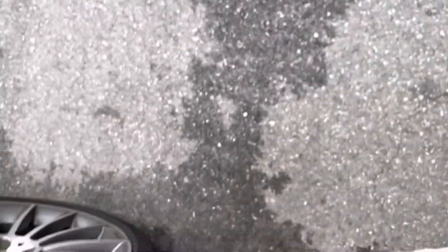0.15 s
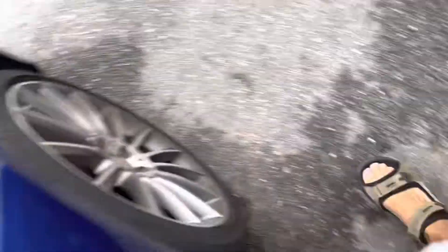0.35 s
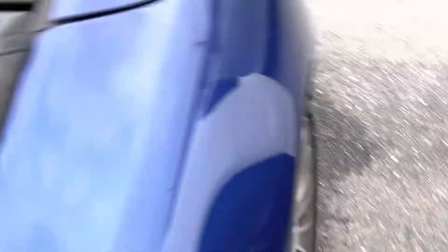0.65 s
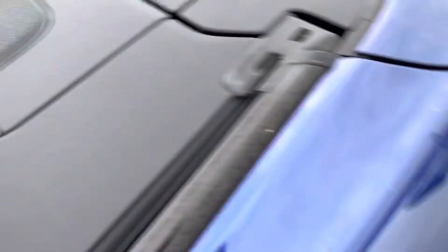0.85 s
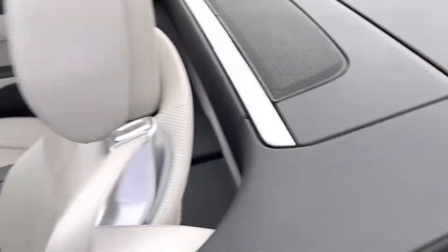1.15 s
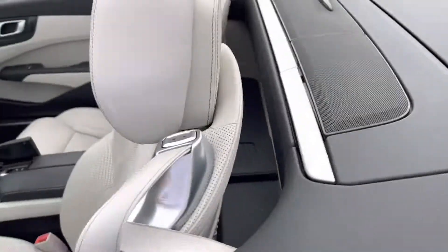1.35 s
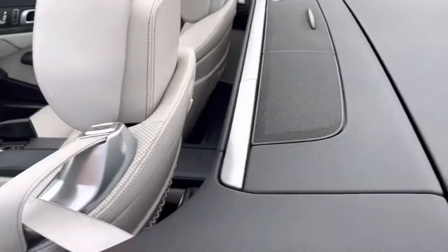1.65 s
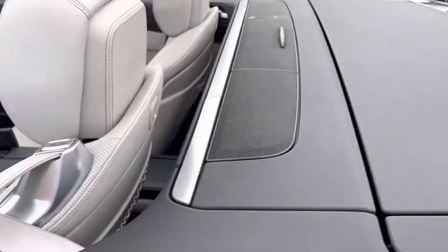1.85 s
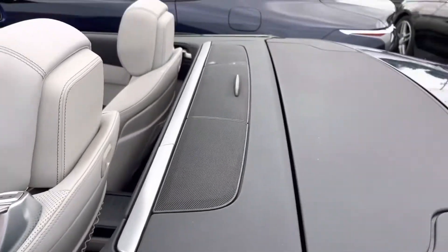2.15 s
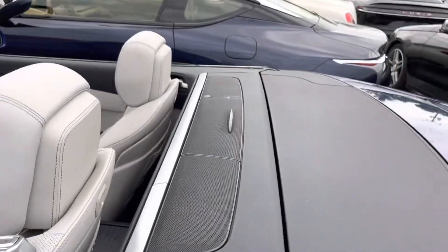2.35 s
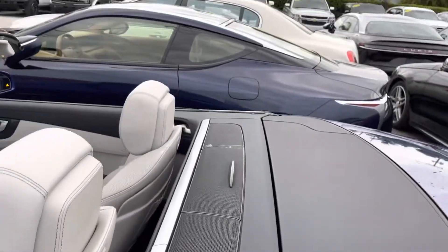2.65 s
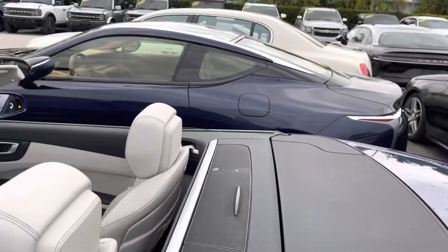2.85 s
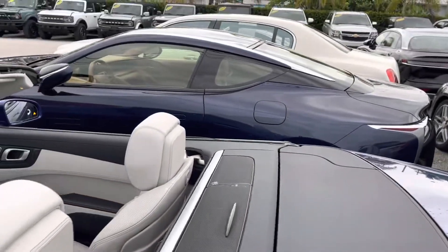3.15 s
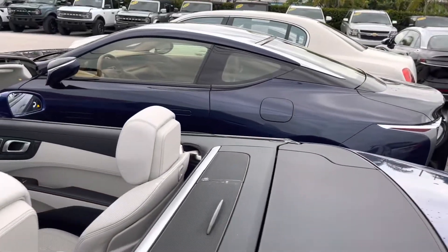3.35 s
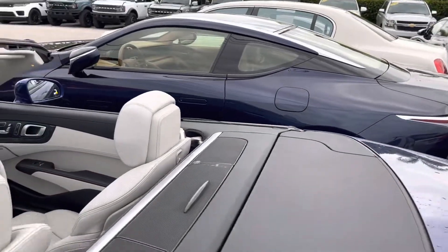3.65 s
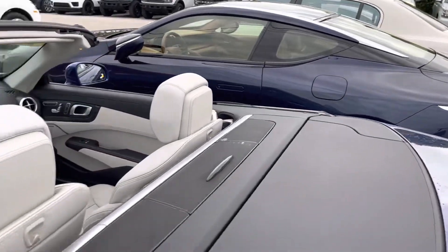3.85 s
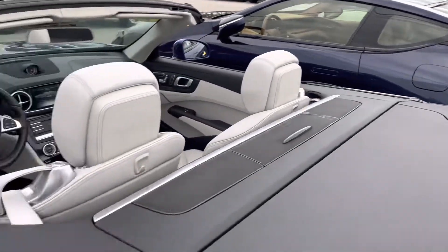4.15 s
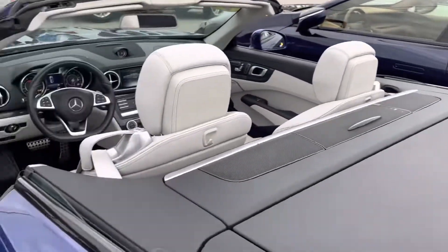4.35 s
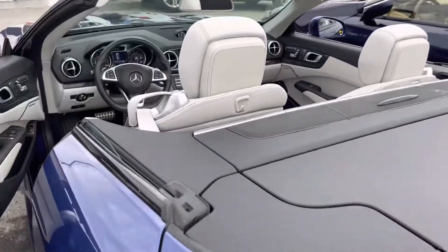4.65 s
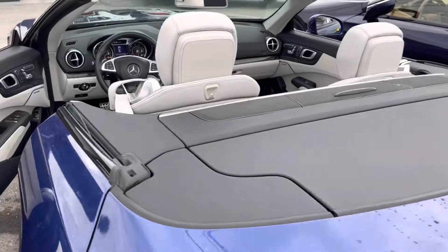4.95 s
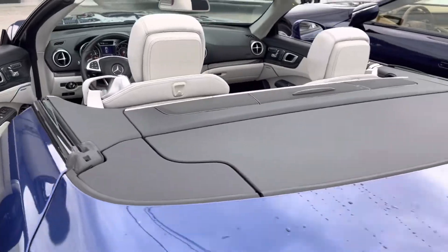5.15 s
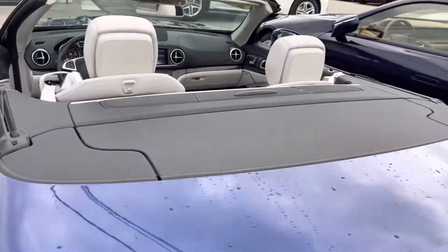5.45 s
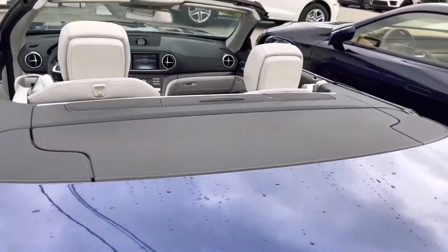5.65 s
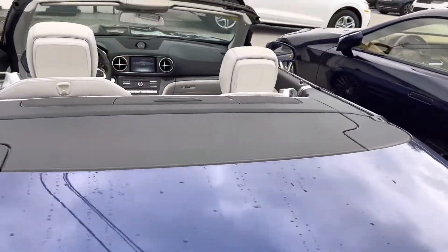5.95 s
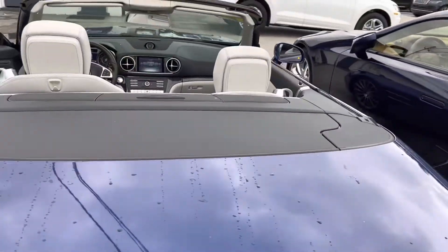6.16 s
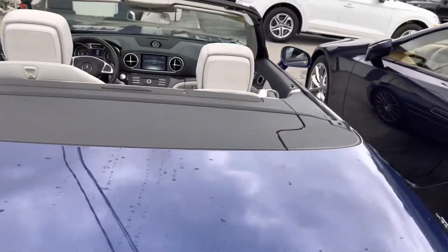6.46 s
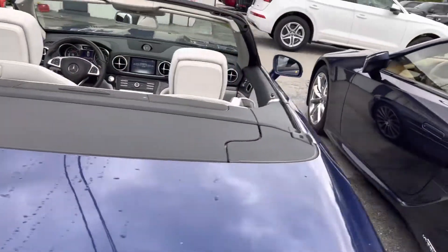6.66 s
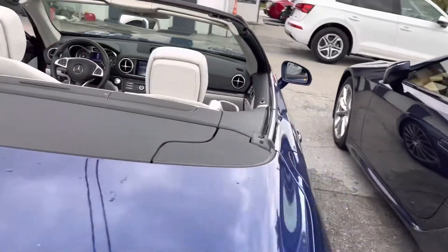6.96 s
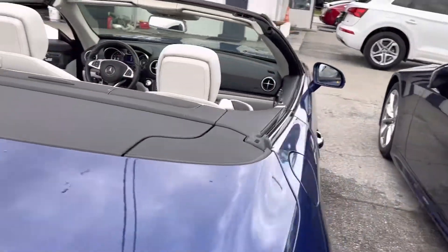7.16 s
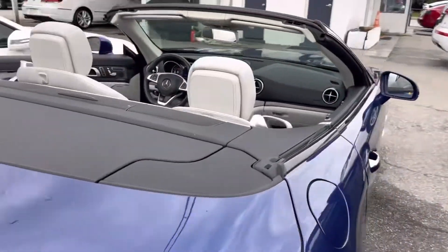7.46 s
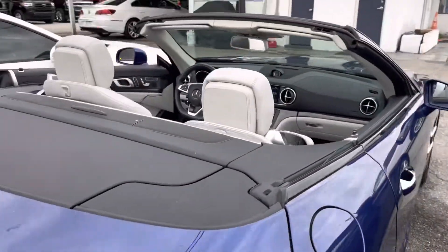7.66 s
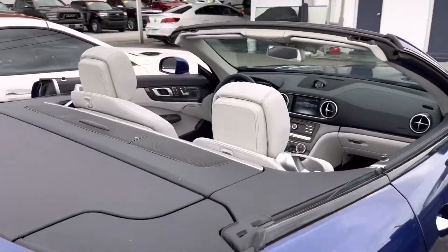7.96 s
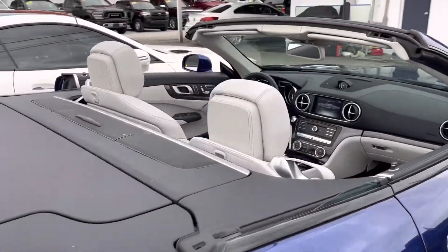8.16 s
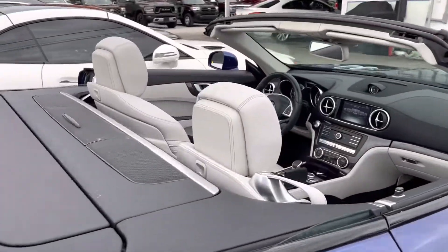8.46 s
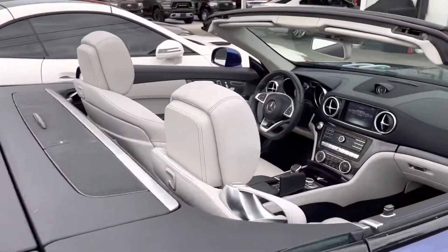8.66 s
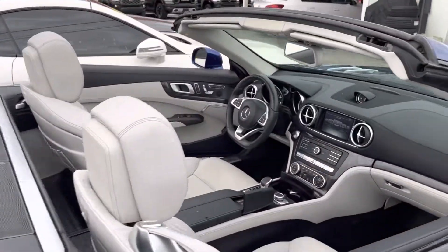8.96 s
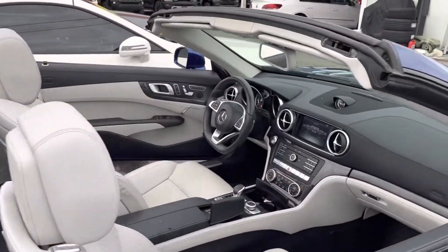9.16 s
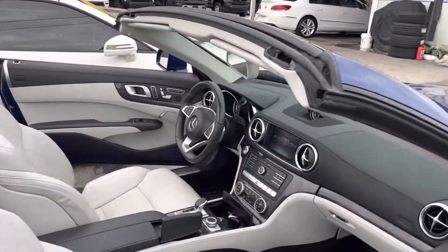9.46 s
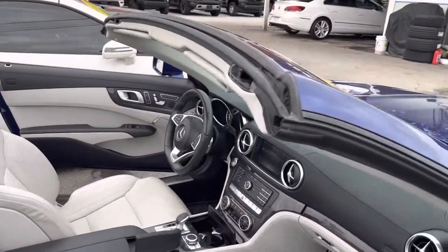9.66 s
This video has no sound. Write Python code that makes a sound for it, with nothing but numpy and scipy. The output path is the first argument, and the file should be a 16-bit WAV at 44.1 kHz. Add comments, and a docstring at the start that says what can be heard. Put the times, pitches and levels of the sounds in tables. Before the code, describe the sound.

Outdoors in an open lot, a car idles steadily, its low exhaust throb mixed with breathy rumble, fine valve ticking and hiss. A handheld stereo microphone moves around the rear. A few dry clicks come within the first second or so; midway, sharp hollow spits pop from the tailpipe, then the sound thins toward the far side. A soft dull thud falls near the end.

```python
"""An open lot: a six-cylinder car idles while a listener with a two-port microphone walks round its tail.
The exhaust throbs as sinusoids at multiples of the firing rate, and each firing gates a puff of filtered noise
and slaps the tailpipe into ringing; sharp hollow spits are short decaying tones. Valve ticks modulate a thin
mechanical hiss and ring the engine covers. The colour shifts with the listener's place, and a few small clicks
and one soft thud fall nearby."""
import sys
import numpy as np
from scipy import signal
from scipy.fft import rfft, irfft
from scipy.io import wavfile
from scipy.ndimage import uniform_filter1d

SR = 44100
rng = np.random.default_rng(int(sys.argv[2]) if len(sys.argv) > 2 else 0)


def put_to_file(sound):
    """Save the sound as 16-bit audio at rate SR, in the file named by the first command-line argument."""
    columns = np.atleast_2d(sound).T  # one column per channel
    safe = np.clip(columns, -1, 1)
    whole_steps = np.round(safe * 32767)
    wavfile.write(sys.argv[1], SR, whole_steps.astype(np.int16))


N = 433045
T = np.arange(N) / SR  # time [s]
HZ = np.fft.rfftfreq(N, 1 / SR)  # frequency of each spectral bin [Hz]


def amp(db):
    """Logarithmic level: decibels to amplitude gain."""
    return 10 ** (np.asarray(db) / 20)


def unit(x):
    """Power normalization: scales to rms 1."""
    return x / np.sqrt(np.mean(x ** 2) + 1e-20)


def read(points, hz):
    """Spectral envelope: interpolates a table on a logarithmic frequency axis."""
    f, value = np.transpose(points)
    return np.interp(np.log(hz + 1), np.log(f + 1), value)


def column(table, index):
    """Time envelope: one column of a table, interpolated at every sample."""
    rows = np.array(table)
    return np.interp(T, rows[:, 0], rows[:, index])


def drift(rate_hz):
    """Random fluctuation: low-passed noise of rms 1, computed at 200 points a second."""
    steps = rng.standard_normal(4000)
    b, a = signal.butter(2, np.clip(rate_hz / 100, .001, .9))
    slow = signal.filtfilt(b, a, steps)[1000:3000]  # the middle is free of filter edges
    return np.interp(T * 200, np.arange(2000), unit(slow))


def peaks(modes):
    """Resonance: the power sum of several peaked responses, as a gain over frequency."""
    power = 0
    for hz, width, db in modes:
        detuning = 2 * (HZ - hz) / width
        power = power + amp(db) ** 2 / (1 + detuning ** 2) ** 2
    return np.sqrt(power)


def puffed(gate, gain):
    """Modulated turbulence: two unrelated noises, gated in time and then coloured."""
    noise = gate * rng.standard_normal((2, N))
    return unit(irfft(rfft(noise) * gain, N))


def rung(blows, modes):
    """Impulse response: blows convolved with the decaying sines of a set of resonances."""
    t = np.arange(2000) / SR
    ring = 0
    for hz, width, db in modes:
        ring = ring + amp(db) * np.exp(-np.pi * width * t) * np.sin(2 * np.pi * hz * t)
    return unit(signal.oaconvolve(blows, ring)[:N])


def add(mix, s, sound, pan_db):
    """Superposition: adds a short sound from s seconds on, with a left-right level difference."""
    part = mix[:, round(s * SR):][:, :sound.shape[1]]
    part += sound[:, :part.shape[1]] * amp([[pan_db / 2], [-pan_db / 2]])


# Firing rate and exhaust orders at the listener's place: (time [s], firing rate [Hz],
# second order [dB rms], third order [dB rms], fourth order [dB rms]), before the ports are set apart
EXHAUST = [(0.0, 40.813, -18.4, -22.2, -34.5), (0.6, 40.415, -21.5, -26.3, -39.7),
           (1.2, 40.273, -25.4, -29, -43), (1.8, 40.626, -23.4, -28.6, -43),
           (2.4, 40.186, -24.1, -28.5, -41.3), (3.3, 40.298, -25.3, -30.4, -40),
           (3.9, 40.808, -23.6, -30.5, -47), (4.3, 40.455, -20.8, -31.8, -46.6),
           (4.8, 40.754, -22.2, -32.5, -39.7), (5.4, 41.762, -23, -23.6, -35.6),
           (5.9, 41.608, -22.4, -21.2, -31.7), (6.6, 40.49, -26, -24.8, -36),
           (7.1, 39.883, -24.3, -30.6, -38), (7.5, 40.072, -24.2, -35, -38.4),
           (8.1, 39.611, -22.8, -36.6, -41.7), (9.0, 39.641, -25.4, -33.9, -52),
           (9.82, 39.663, -29.5, -38.7, -48)]


def firings():
    """Phase accumulation: the integral of the firing rate counts the firings so far."""
    return np.cumsum(column(EXHAUST, index=1)) / SR - .032


# Main exhaust orders: (multiple of the firing rate [1], ...)
MAIN_ORDERS = (1, 2, 2.5, 3, 4)
# Weak orders between the main ones, from unequal cylinders: (sixths of the firing rate [1], mean level [dB rms])
UNEVEN = [(5, -50), (7, -48), (8, -47), (9, -45), (10, -46), (11, -46), (13, -44), (17, -46), (19, -49)]
FIRINGS_PER_CYCLE = 6
# The first order holds, then sinks as the listener leaves the tail
FIRST_DB, LEAVE_S, LEAVE_DB_PER_S = -19, 6.2, -2
# Order 2.5 is stronger at first, while the microphone hangs low
HALF_DB, LOW_S, LOW_DB = -36.3, 1.1, 4.5
# The second order slips behind as the listener rounds the car: quickly at first, then slowly
SLIP_RAD, SLIP_S, SLIP_RAD_PER_S = 1.4, 0.9, 0.2


def throb(turns):
    """Fourier synthesis: orders sum to a narrow suction pulse whose upper orders run ahead in the pipe."""
    out = np.zeros((2, N))
    away = np.maximum(T - LEAVE_S, 0)
    slip = SLIP_RAD * np.minimum(away / SLIP_S, 1) + SLIP_RAD_PER_S * away
    levels = (
        FIRST_DB + LEAVE_DB_PER_S * away,
        column(EXHAUST, index=2),
        HALF_DB + LOW_DB * np.maximum(1 - T / LOW_S, 0),
        column(EXHAUST, index=3),
        column(EXHAUST, index=4),
    )
    for order, db in zip(MAIN_ORDERS, levels):
        ahead = np.pi * (order - 1) + .6 * (order - 1) * (order - 2)  # [rad]
        if order == 2:
            ahead = ahead - slip
        # the ports differ more for higher orders
        apart = 0.028 * (order - .7) * (1 + drift(0.78)) * np.array([[-1], [1]])
        phase = 2 * np.pi * order * turns + ahead + 0.57 * apart
        out += amp(db) * (1 + apart) * np.cos(phase)
    for sixths, db in UNEVEN:
        phase = 2 * np.pi * (round(sixths) / FIRINGS_PER_CYCLE * turns + rng.random())
        out += amp(db + 1.5 * drift(1.5)) * np.cos(phase)
    return np.sqrt(2) * out  # rms to peak amplitude


# Higher orders that stand out along parts of the walk:
# (multiple of the firing rate [1], start [s], end [s], mean level at full swell [dB rms])
PASSING = [(13 / 6, -1, 3.3, -41), (13 / 6, 3.9, 4.9, -38), (5, -1, 5, -47), (5, 5.4, 7.8, -43.5),
           (6, -4, 6, -45), (6, 5.2, 7.4, -45), (7, 5.3, 7, -47), (8, -4, 5.6, -43), (9, 5.8, 7.5, -47),
           (10, 5.2, 6.2, -44), (11, -2, 2.6, -46), (11, 2.2, 5.6, -48.5), (11, 5.6, 9.2, -46),
           (13, 1.8, 3.8, -50), (15, 5.5, 6.6, -51), (16.5, -1, 1.6, -48), (18.3, 9.3, 10.5, -49),
           (19, 4.1, 5.5, -50), (19, 5.9, 6.8, -50), (20, 3.7, 5.4, -50), (23, 3.8, 4.7, -53)]


def overtones(turns):
    """Amplitude and phase modulation: higher orders swell and fade, unlike in phase at the two ports."""
    out = np.zeros((2, N))
    for order, start, end, db in PASSING:
        swell = np.sin(np.pi * np.clip((T - start) / (end - start), 0, 1)) ** 0.88
        port_wobble = 0.26 * np.array([drift(3.3), drift(1.5)])
        wobble = port_wobble + .5 * drift(6.2) + rng.random() * 2 * np.pi
        level = swell * amp(db + 0.62 * drift(9.6))
        out += level * np.cos(2 * np.pi * order * turns + wobble)
    return np.sqrt(2) * out


# Noise levels along the walk, before slaps, reflections and ports: (time [s], rumble [dB],
# puffs at the pipe mouth [dB], rasp of the puffs [dB], machinery [dB], hiss [dB])
WALK = [(0.0, -33.5, -53, -50, -44, -39.5), (0.55, -31.5, -43, -47.5, -44.5, -41),
        (0.8, -32.5, -64, -44, -49, -47.5), (1.3, -33.5, -45, -49.5, -50, -47),
        (2.5, -39, -46, -52, -49.5, -46.5), (3.6, -36.5, -48, -50, -52.5, -47),
        (4.2, -36, -44, -55.5, -49, -42.5), (4.7, -36.5, -44, -61, -48.5, -44),
        (5.4, -36.5, -46.5, -54, -59, -46.5), (6.2, -38.5, -52, -59, -62, -47),
        (7.0, -35.5, -47.5, -54, -57, -47.5), (7.6, -36.5, -54, -56.5, -59, -46.5),
        (8.7, -36.5, -51, -48.5, -49.5, -45.5), (9.82, -37.5, -44.5, -49.5, -51.5, -46)]
# How squarely the tailpipes face the listener: (time [s], facing [0-1])
BEHIND = [(0, 0.1), (3.5, 0.2), (4.2, 0.46), (5.2, 0.52), (6.3, 0.94), (7, 0.6), (9.82, 0.04)]
# Rumble spectrum: (frequency [Hz], relative density [dB])
RUMBLE = [(35, -25), (70, 3.5), (130, 0.5), (250, -7), (450, -6.5), (650, -12), (1000, -17), (2000, -45)]
# Tailpipe resonances: (frequency [Hz], width [Hz], relative level [dB])
MOUTH = [(664, 60, 1.5), (788, 120, 2), (953, 57, -2)]
# Resonances that colour the rasp: (frequency [Hz], width [Hz], relative level [dB])
RASP = [(1366, 460, 5.5), (1540, 60, 9.5), (1730, 220, 6), (2033, 68, 8)]


def gas(turns):
    """Jet turbulence and pipe resonance: each firing slaps the tailpipe and sends a puff of its own size."""
    arrival = turns + .2 + .025 * drift(30.0)
    sizes = amp(1.8 * np.clip(rng.standard_normal(500), -2, 1.5))
    size = sizes[arrival.astype(int)]
    age = (arrival % 1) / 0.19  # a puff peaks 0.19 of a firing period after it starts
    facing = np.clip(column(BEHIND, index=1), 0, 1)
    puff = facing * size * age * np.exp(1 - age)
    struck = np.diff(np.floor(arrival - .07), prepend=0) > 0
    slaps = facing * size * struck
    rumble = amp(column(WALK, index=1)) * puffed(9.3 + puff, amp(read(RUMBLE, HZ)))
    mouth = puffed(0.29 + puff, peaks(MOUTH)) + 0.57 * rung(slaps, MOUTH)
    rasp = puffed(.45 + puff, peaks(RASP)) + .35 * rung(slaps, RASP)
    return rumble + amp(column(WALK, index=2)) * mouth + amp(column(WALK, index=3)) * rasp


# Loudest spits of the tailpipe, heard from behind the car: (time [s], nominal level [dB], centre [Hz])
SPITS = [(3.8772, -35.5, 1570), (4.2787, -36, 1540), (4.3276, -33, 1230), (5.2201, -32, 1280),
         (5.4441, -38, 1330), (5.4915, -35, 1660), (5.6112, -38, 1370), (5.7559, -35, 1270),
         (5.9729, -34, 1300), (6.1899, -39, 1290)]
# Weaker spits on some firings: time span, chance per firing, highest nominal level, low or high centre
SPIT_FROM_S, SPIT_TO_S, SPIT_SHARE = 4.85, 6.4, 0.6
SPIT_DB, SPIT_LOW_HZ, SPIT_HIGH_HZ = -36.5, 1270, 1780


def spits(turns):
    """Damped oscillation: sharp hollow bursts of a few cycles at the centre in a spray of noise."""
    out, t = np.zeros((2, N)), np.arange(800) / SR
    fired = T[np.diff(np.floor(turns + .27), prepend=0) > 0]
    chance = rng.random((500, 3))
    weak = []
    for s, (luck, soft, pitch) in zip(fired, chance):
        if SPIT_FROM_S < s < SPIT_TO_S and luck < SPIT_SHARE:
            centre_hz = SPIT_HIGH_HZ if pitch < .35 else SPIT_LOW_HZ
            weak.append((s, SPIT_DB - 6.4 * soft, centre_hz * (1 + 0.088 * (soft - luck))))
    band = signal.butter(2, [900, 2200], "bandpass", fs=SR)
    envelope = np.minimum(t / 0.0021, 1) * np.exp(-t / 0.0082)
    for s, db, hz in SPITS + weak:
        spray = signal.lfilter(*band, rng.standard_normal((2, 800)))
        tone = np.sin(2 * np.pi * hz * t + [[0], [1.1]])  # the ports differ in phase
        add(out, s, amp(db) * (tone + 0.17 * unit(spray)) * envelope, -1.5)
    return out


# Valve gear ticks: (place in the engine cycle [0-1], relative level [dB])
TICKS = [(.93, -2.5), (.6, -2.5), (.43, -6.5), (.16, -21)]
# Engine cover resonances: (frequency [Hz], width [Hz], relative level [dB])
COVERS = [(2260, 430, -0.5), (3180, 570, 5.5), (3630, 150, 3), (3950, 400, 0.5), (5200, 610, -1),
          (6210, 1500, -3.5)]
# Mechanical hiss spectrum: (frequency [Hz], relative density [dB])
HISS = [(700, 0), (1200, 2.5), (2500, 1), (4500, -0.5), (7000, -4.5), (8300, -2), (9500, -0.5), (10800, 1),
        (11500, -3), (12300, -18), (12600, -36)]


def machinery(turns):
    """Forced vibration: valve ticks, once each per engine cycle over rubbing noise, ring the covers."""
    cycle = turns / FIRINGS_PER_CYCLE
    ticks = 0
    for place, db in TICKS:
        ticks = ticks + amp(db) * np.exp(-((cycle - place) % 1) / 0.072)
    ring_gate = (1.3 + .5 * ticks) * amp(1.2 * drift(27.0))
    ring = amp(column(WALK, index=4)) * puffed(ring_gate, peaks(COVERS))
    hiss_gate = (0.9 + 0.54 * ticks) * amp(0.65 * drift(38.0))
    hiss = amp(column(WALK, index=5)) * puffed(hiss_gate, amp(read(HISS, HZ)))
    return ring + hiss


# Small clicks: (time [s], nominal level [dB], centre [Hz], left-right difference [dB], crackle decay [s])
CLICKS = [(0.601, -33, 3050, 0, 0.016), (.62, -28, 2000, -3, 0.0052), (.853, -31, 9000, 1, 0.0044),
          (.869, -29.5, 1700, -4, 0.0064), (0.88, -29, 8200, 4, 0.01), (.885, -29, 2800, -3, 0.0025),
          (0.8876, -22.5, 1490, -2, 0.004), (0.896, -27, 1150, -5, .004), (.897, -34, 5000, 7, 0.0026),
          (0.984, -23, 2960, 1, 0.00052), (1.125, -38, 8000, 0, 0.0088)]
# Blows that make up the soft thud: (time [s], nominal level [dB], left-right difference [dB])
THUDS = [(9.113, -16.5, 0.0), (9.152, -18, -1.0), (9.178, -26, 5)]


def knocks():
    """Impact transients: dry clicks of a snap and a broad crackle, then a dull low thud on the ground."""
    out, t = np.zeros((2, N)), np.arange(4096) / SR
    hz = np.fft.rfftfreq(4096, 1 / SR)
    for s, db, centre_hz, pan_db, decay in CLICKS:
        shape = .08 + 1 / (1 + (np.log(hz / centre_hz + 1e-9) / .55) ** 2)
        noise = irfft(rfft(rng.standard_normal((2, 4096))) * shape * (hz > 350), 4096)
        mixed = unit(noise + 0.31 * noise[::-1])  # each port hears some of the other's noise
        fall = np.exp(-t / decay) + 0.13 * np.exp(-t / 0.027)
        crackle = mixed * np.minimum(t / 0.00098, 1) * fall
        snap = -np.sin(2 * np.pi * centre_hz * t) * np.exp(-t * centre_hz / 0.83)
        add(out, s, amp(db) * (crackle / 2 + 2.0 * snap), pan_db)
    push = t / 0.0053 * np.exp(1 - t / 0.0026)
    body = np.sin(2 * np.pi * 280 * t + [[0], [1.2]]) + 2.8 * np.sin(2 * np.pi * 60 * t)
    for s, db, pan_db in THUDS:
        add(out, s, amp(db) * push * body, pan_db)
    return out


def walking(pair):
    """Interference: reflections off cars and ground make bands swell and sink as the listener moves."""
    hz, t, z = signal.stft(pair, SR, nperseg=1024)
    slow, quick = rng.standard_normal((2, len(hz), len(t)))
    # slow: narrow bands, long in time; quick: broad bands, short in time
    slow = unit(uniform_filter1d(uniform_filter1d(slow, size=2, axis=0), size=50, axis=1))
    quick = unit(uniform_filter1d(uniform_filter1d(quick, size=14, axis=0), size=4, axis=1))
    gain = amp(2.53 * slow + 1.12 * quick)
    return signal.istft(z * gain, SR, nperseg=1024)[1][:, :N]


# Likeness of the two ports: (frequency [Hz], coherence [0-1])
SAME = [(60, 0.46), (250, 0.81), (500, 0.53), (1000, 0.24), (1700, 0.044), (2900, 0.68), (4500, 0.34),
        (6200, 0.96), (7200, 0.21), (8500, 1), (12000, 0.98)]
# Phase by which the left port leads: (frequency [Hz], lead [rad])
LEAD = [(60, 0), (1200, 0), (1900, -1.1), (2700, .6), (5100, .7), (6700, .1), (7600, .7), (8700, 0),
        (9400, -1.9), (10250, -3.14), (11800, -6.1), (12600, -6.4)]
# Level balance of the ports: (frequency [Hz], left-right difference [dB])
TILT = [(60, 0), (200, -1), (640, -2), (1500, -2), (3800, 1.5), (6900, 1.8), (9000, 0)]


def ports(pair):
    """Partial coherence: two ports partly alike, with a phase lead that cancels their sum near 10 kHz."""
    first, second = rfft(pair)
    same = np.clip(read(SAME, HZ), 0, 1)
    tilt = amp(read(TILT, HZ) / 2)
    shared = same * first * np.exp(-1j * read(LEAD, HZ))
    right = shared + np.sqrt(1 - same ** 2) * second
    return irfft(np.array([first * tilt, right / tilt]), N)


def scene():
    """Superposition: all sources add at the microphone."""
    turns = firings()
    noise = ports(walking(gas(turns) + machinery(turns)))
    return throb(turns) + overtones(turns) + noise + knocks() + spits(turns)


EDGE_HZ = 13050


def record(dry):
    """Band limitation: a linear-phase low-pass stands for the recorder."""
    lowpass = signal.firwin(511, EDGE_HZ, window=("kaiser", 9), fs=SR)
    return signal.oaconvolve(dry, lowpass[None], "same")


dry = scene()
out = record(dry)
put_to_file(out)
```